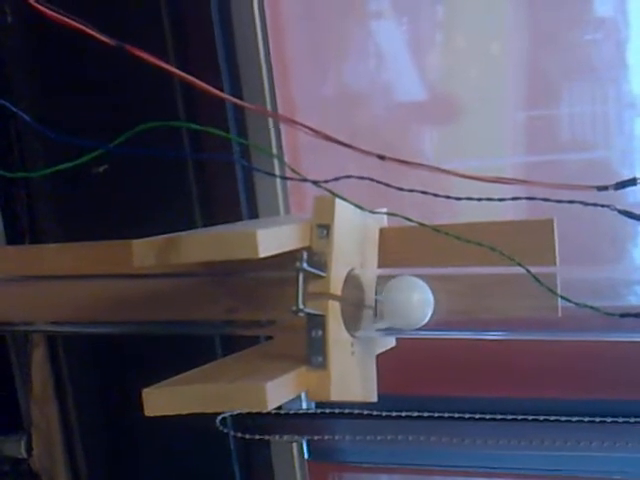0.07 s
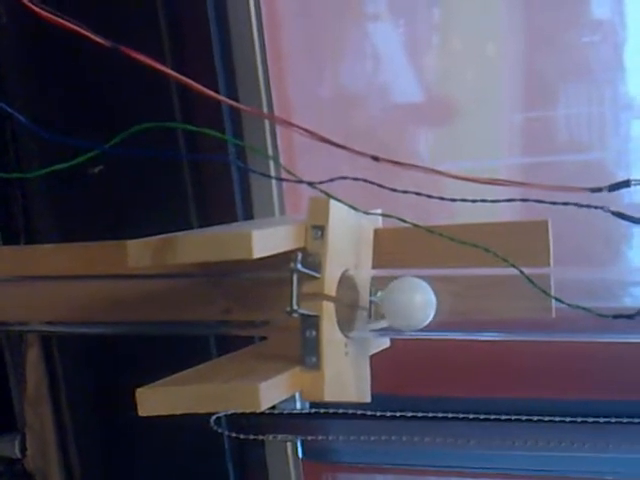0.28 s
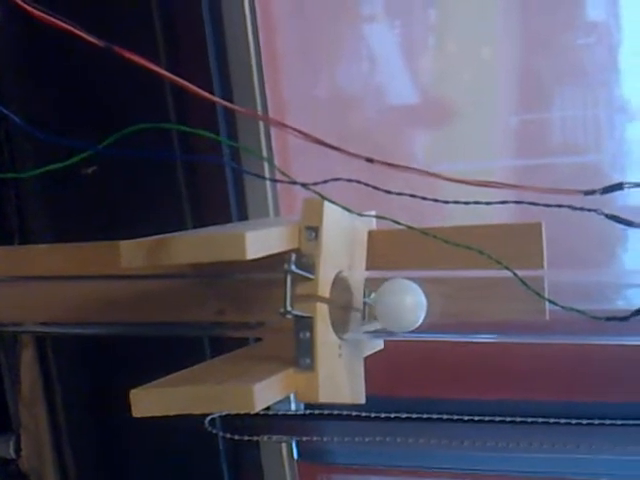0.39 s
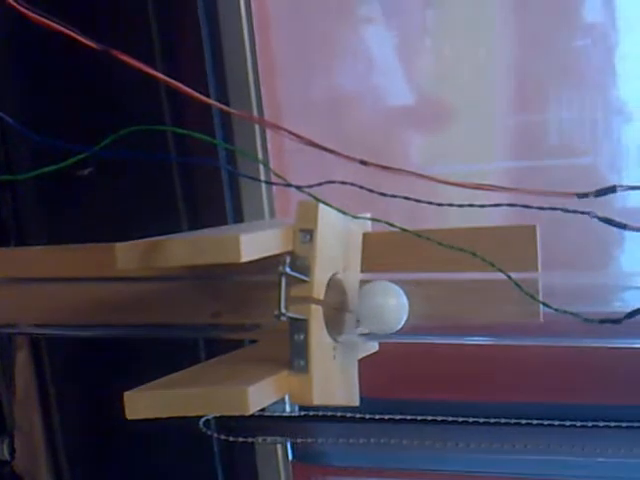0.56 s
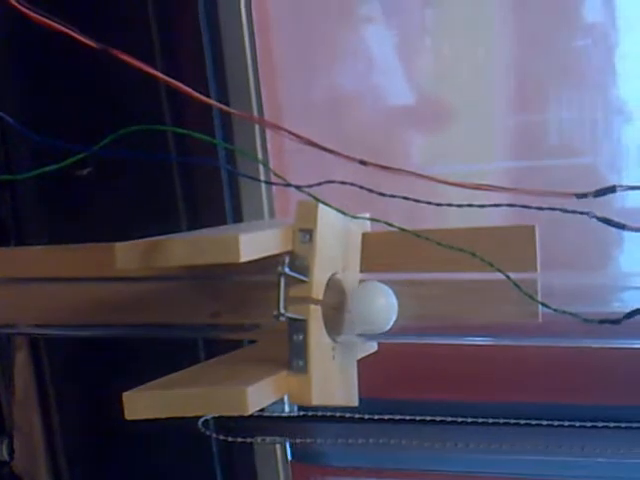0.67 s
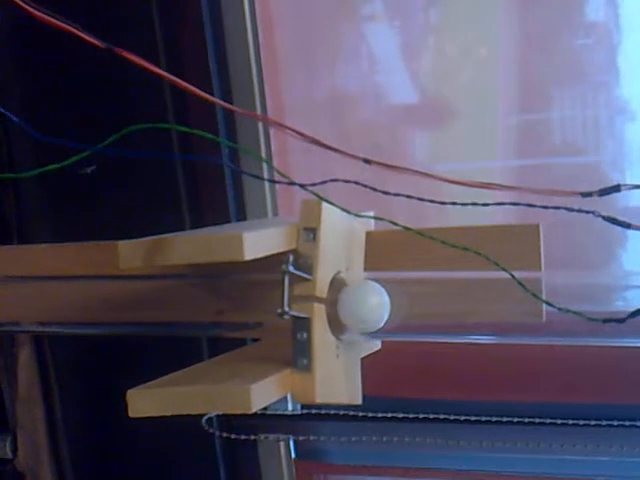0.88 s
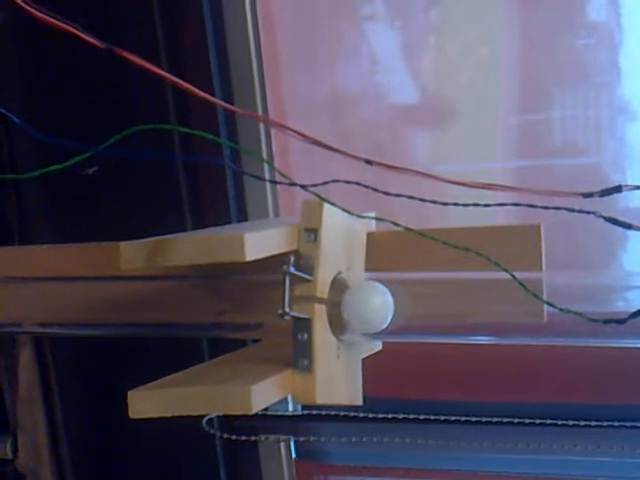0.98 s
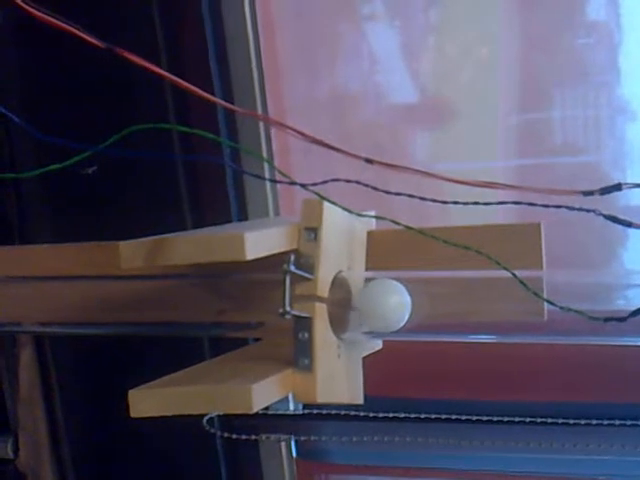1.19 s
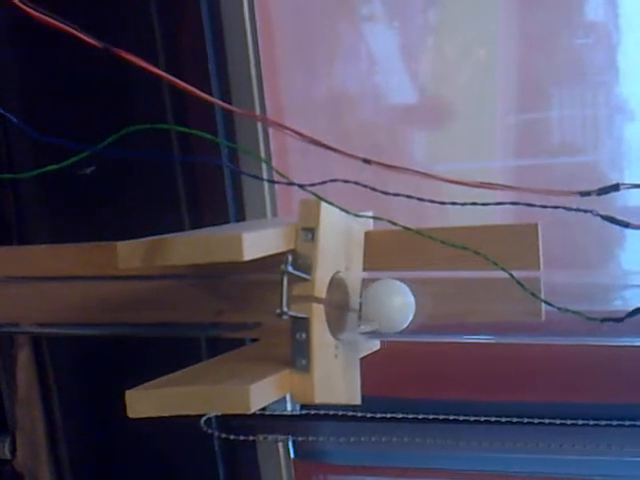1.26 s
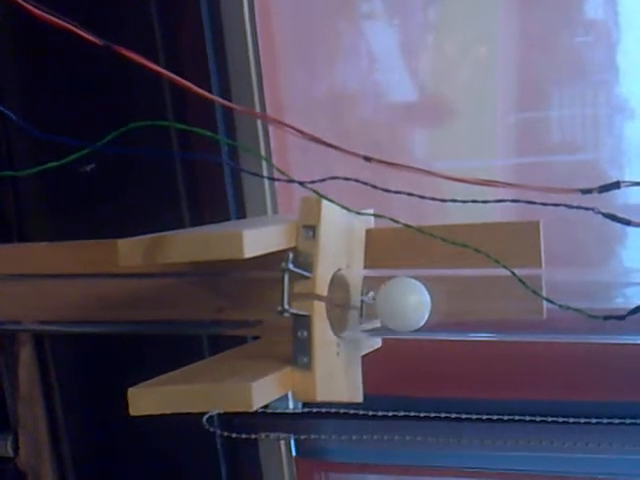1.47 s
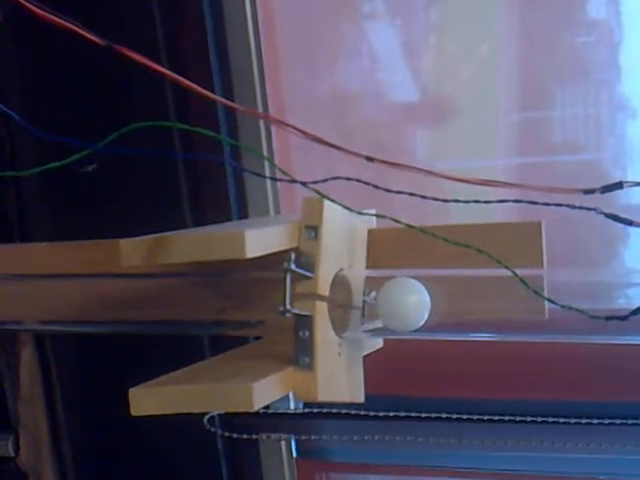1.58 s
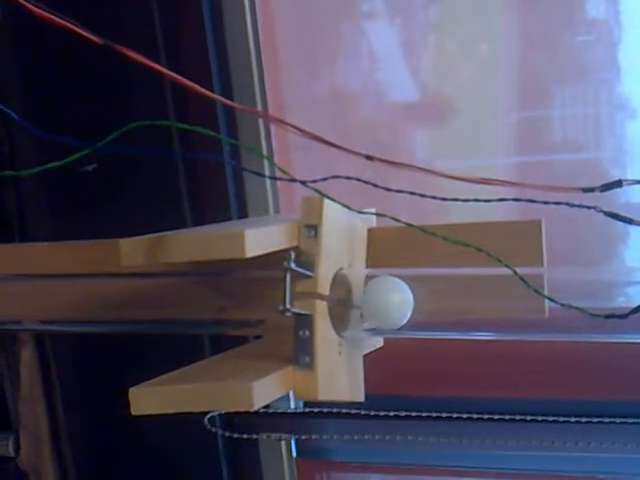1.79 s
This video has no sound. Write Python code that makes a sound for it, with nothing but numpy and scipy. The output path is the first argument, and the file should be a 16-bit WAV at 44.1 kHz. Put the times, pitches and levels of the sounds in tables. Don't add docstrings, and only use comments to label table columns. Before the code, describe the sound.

A light hollow ball knocks on a wooden stop in a live room, a few metres from the microphone. An earlier knock's tail fades under soft taps at 0.04-0.08 s; a loud, tight rattle follows at 0.2-0.25, then weaker knocks at 0.36-0.39. Faint taps come around 0.86-1.11, a moderate cluster at 1.2-1.26, and quiet ticks at 1.77. Reverberation trails over faint steady hiss and hum.

```python
import sys
import numpy as np
from scipy import signal
from scipy.fft import rfft, irfft
from scipy.io import wavfile
from scipy.ndimage import uniform_filter1d

SR = 44100
rng = np.random.default_rng(int(sys.argv[2]) if len(sys.argv) > 2 else 0)


def volts_from_db(level):
    exponent = np.asarray(level, float) / 20
    return 10 ** exponent


def bounce(signal):
    frames = np.transpose(np.atleast_2d(signal))
    limited = np.clip(frames, -1, 1)
    pcm = np.round(limited * 32767).astype(np.int16)
    wavfile.write(sys.argv[1], SR, pcm)


N = 79380


def unit_rms(x):
    return x / np.sqrt(np.mean(x ** 2) + 1e-20)


def interpolate_log(points, hz):
    f, value = np.transpose(points)
    return np.interp(np.log(hz + 1), np.log(f + 1), value)


# (frequency [Hz], density [dB per Hz])
HISS_SPECTRUM = [(15, -36), (25, 0.5), (144, -12.5), (291, -8), (333, -8), (708, -12), (768, -13.5),
                 (903, -6), (15700, -38)]
# (centre [Hz], width [Hz], level [dB])
HUM_BANDS = [(45, 20, -63), (137, 33, -65), (332.8, 4, -65), (1753, 1050, -59.5)]
HISS_DB, PATCH_DB = -57, 0.5


def hiss_and_hum():
    frames = N // 256 + 5
    hz = np.fft.rfftfreq(1024, 1 / SR)
    real, imaginary, patches = rng.standard_normal((frames, 513, 3)).T
    patches = uniform_filter1d(patches, size=12, axis=0)
    patches = unit_rms(uniform_filter1d(patches, size=12, axis=1))
    level_db = interpolate_log(HISS_SPECTRUM, hz)[:, None] + PATCH_DB * patches
    spectrum = (real + 1j * imaginary) * volts_from_db(level_db)
    hiss = signal.istft(spectrum, nperseg=1024, noverlap=768)[1][:N]
    out = volts_from_db(HISS_DB) * unit_rms(hiss)
    fine_hz = np.fft.rfftfreq(N, 1 / SR)
    for centre_hz, width_hz, db in HUM_BANDS:
        resonance = 1 / (1 + ((fine_hz - centre_hz) / width_hz * 2) ** 2)
        hum = irfft(rfft(rng.standard_normal(N)) * resonance, N)
        out = out + volts_from_db(db) * unit_rms(hum)
    return out


# (frequency [Hz], t60 [s])
ROOM_T60 = [(80, 0.51), (300, 0.33), (700, 0.4), (2000, 0.39), (5000, .33), (10000, 0.29), (16000, 0.29)]
HOLD_S, HOLD_SHARE = 0.079, 0.73
DIRECT_DB, BUILD_S = -32, 0.0043
LATE_DB, LATE_STRETCH = -23, 2.38


def room():
    hz, t, noise = signal.stft(rng.standard_normal(SR + SR // 2), SR, nperseg=256)
    fall_time = t - (1 - HOLD_SHARE) * np.minimum(t, HOLD_S)
    fall_db = -60 * fall_time / interpolate_log(ROOM_T60, hz)[:, None]
    early_power = volts_from_db(2 * fall_db)
    late_power = volts_from_db(2 * (LATE_DB + fall_db / LATE_STRETCH))
    tail = signal.istft(noise * np.sqrt(early_power + late_power), SR, nperseg=256)[1]
    tail = tail * (1 - np.exp(-np.arange(len(tail)) / SR / BUILD_S))
    tail = tail / np.linalg.norm(tail)
    return np.concatenate([[volts_from_db(DIRECT_DB)], tail])


def modal_sum(modes, t):
    return sum(volts_from_db(db - 60 * t / t60) * np.sin(2 * np.pi * hz * t) for hz, db, t60 in modes)


def ringing(modes, rise_s, t):
    return (1 - np.exp(-t / rise_s)) * modal_sum(modes, t)


# (time [s], tap [dB], frame ring [dB], tube ring [dB], hollow ball [dB])
FIRM_CONTACTS = [(.083, -43, -52, -48, -29), (0.2049, -14, -34, -44, -11), (.219, -12, -38, -29, -13),
                 (0.228, -7, -34, -32, -18), (0.237, -4.5, -27, -14, -8), (0.2403, -4.5, -28.5, -23, -12.5),
                 (.245, -16, -30, -27, -8), (0.2536, -2, -34.5, -43, -16), (.364, -18, -32.5, -57, -13.5),
                 (.377, -22, -38, -28.5, -7.5), (.392, -28, -37, -43, -28), (.425, -26, -41, -48, -34),
                 (0.526, -40, -60, -61, -44), (0.8817, -32.5, -57, -46, -31), (.9, -48, -70, -43.5, -41),
                 (1.11, -44, -68, -66, -50), (1.196, -38, -74, -62, -44), (1.2218, -17, -44, -49, -20),
                 (1.236, -21, -54, -54, -32), (1.258, -39, -47, -48, -24), (1.286, -28, -60, -54, -38),
                 (1.771, -30.5, -56, -53, -32), (1.776, -40, -58, -53, -52)]
# (frequency [Hz], level [dB], t60 [s])
TAP_MODES = [(1067, -6, 0.019), (2000, 3, 0.013), (1410, -3, 0.014), (3350, -24, 0.023),
             (4730, -9.5, 0.0065)]
# (frequency [Hz], level [dB], t60 [s])
FRAME_MODES = [(342.9, -2.5, 0.32), (400.5, -1.5, 0.2), (217, -7, 0.22), (126.7, -11.5, 0.26),
               (647, -5.5, .2), (901, 3, 0.18), (1017, -10, 0.18)]
# (frequency [Hz], level [dB], t60 [s])
TUBE_MODES = [(1918, 0, 0.26), (1975, -5.5, 0.28), (1793, -9, 0.59), (1662, -6, 0.28), (1554, -4, 0.14),
              (2150, -11, 0.18)]
# (frequency [Hz], level [dB], t60 [s])
HOLLOW_MODES = [(1955, -3, 0.021), (1628, -5.5, 0.011), (415, -16, 0.045)]
TAP_RISE_S, RING_RISE_S = 0.00045, 0.0013


def firm_taps():
    t = np.arange(SR // 2) / SR
    tap = ringing(TAP_MODES, TAP_RISE_S, t)
    frame = ringing(FRAME_MODES, RING_RISE_S, t)
    tube = ringing(TUBE_MODES, RING_RISE_S, t)
    hollow = ringing(HOLLOW_MODES, TAP_RISE_S, t)
    near, far = np.zeros((2, N + len(t)))
    for s, tap_db, frame_db, tube_db, hollow_db in FIRM_CONTACTS:
        start = round(s * SR)
        span = slice(start, start + len(t))
        near[span] += volts_from_db(tap_db) * tap + volts_from_db(frame_db) * frame + volts_from_db(tube_db) * tube
        far[span] += volts_from_db(hollow_db) * hollow
    return near[:N] + signal.fftconvolve(far, room())[:N]


def band(x, hz, kind):
    return signal.sosfilt(signal.butter(2, hz, kind, fs=SR, output="sos"), x)


# (frequency [Hz], level [dB])
BLOW_SPECTRUM = [(35, -49), (60, -20), (293, -14), (345, -0.5), (549, -19.5), (646, -6.5), (1930, -7),
                 (5260, -20.5), (15700, -49.5)]
# (frequency [Hz], level [dB], t60 [s])
WOOD_MODES = [(129, -11.5, 0.11), (212, -25, 0.36), (339, -1, 0.05), (377, -6.5, .1), (652, -3, 0.034),
              (875, -10, 0.23), (1017, -7.5, 0.14), (1430, -14.5, 0.03), (1514, -3.5, 0.1),
              (1757, 3.5, 0.017), (1940, 5, 0.017), (2139, -1.5, 0.013), (2278, -6.5, 0.01),
              (5020, -42, 0.013)]
WOOD_DB, THUD_HZ, TREBLE_HZ = -5, 560, 2740


def knock():
    size = 8192
    log_gain = np.log(volts_from_db(interpolate_log(BLOW_SPECTRUM, abs(np.fft.fftfreq(size, 1 / SR)))))
    phase = -signal.hilbert(log_gain).imag
    click = np.fft.ifft(np.exp(log_gain + 1j * phase)).real
    t = np.arange(size) / SR
    ring = modal_sum([(hz, db - 10 * np.log10(t60), t60) for hz, db, t60 in WOOD_MODES], t)
    whole = click / np.linalg.norm(click) + volts_from_db(WOOD_DB) * ring / np.linalg.norm(ring)
    thud = band(whole, THUD_HZ, "low")
    treble = band(whole, TREBLE_HZ, "high")
    return thud, whole - thud - treble, treble


# (time [s], blow [dB], treble [dB], thud [dB])
BOUNCES_HEARD = [(0.039, -22.5, 2.5, 5.5), (0.057, -19.5, 1, 2.5), (0.068, -22, -4.5, 7),
                 (0.082, -18.5, -0.5, -17), (0.198, -12, -1, -11), (0.204, -7.5, -7, -9),
                 (0.218, -2.5, 0, -4), (0.229, -5, 7.5, -5), (0.237, -3, -3.5, -3.5),
                 (0.244, -8.5, -15, -3.5), (0.253, -12, 0, -5), (0.363, -9, 3.5, 4.5), (0.376, -19, 5.5, 2),
                 (0.391, -23, 2, -19), (0.524, -59, 0, -26), (0.664, -63.5, 24, 16), (0.856, -30.5, 1, -16),
                 (0.863, -30, 1, 7.5), (0.881, -24, 5, -1), (1.004, -33.5, 2, 7), (1.074, -37, 0, -7),
                 (1.11, -34, 1.5, 6.5), (1.197, -27.5, 1.5, 7), (1.21, -13.5, 4.5, -4.5),
                 (1.221, -12, 4, -15), (1.235, -21.5, -4, 0), (1.258, -34, 0, 8), (1.761, -30.5, 4.5, 6),
                 (1.769, -26, -3, -14), (1.776, -25.5, -2, -12)]
EARLIER_S, EARLIER_DB = 0.12, -15
BLOW_DB = -6.5


def bouncing_ball():
    thud, body, treble = knock()
    lead, out = SR // 2, 0
    bounces = [(-EARLIER_S, EARLIER_DB, 0, 0)] + list(BOUNCES_HEARD)
    for path in range(3):
        blows = np.zeros(N + lead + len(thud))
        for s, db, treble_db, thud_db in bounces[path::3]:
            start = lead + round(s * SR)
            blow = volts_from_db(thud_db) * thud + body + volts_from_db(treble_db) * treble
            blows[start:start + len(thud)] += volts_from_db(db + BLOW_DB) * blow
        out = out + signal.fftconvolve(blows, room())[lead:lead + N]
    return out * 10


def scene():
    return (bouncing_ball() + firm_taps() + hiss_and_hum())[None]


def low_pass(x):
    return signal.sosfilt(signal.butter(12, 15890, fs=SR, output="sos"), x)


# (frequency [Hz], gain [dB])
MIC_RESPONSE = [(30, -6), (90, 1), (1200, -1.5), (2000, -2.5), (2400, 0), (2750, -2), (5000, 0.63),
                (11000, -0.74), (16000, -6)]
SELF_DB, EDGE_HZ = -73.5, 15830
FIZZ_DB, FIZZ_PER_DB, FIZZ_FALL_DB_S = -66, 0.6, 60


def record(dry):
    mic = irfft(rfft(dry) * volts_from_db(interpolate_log(MIC_RESPONSE, np.fft.rfftfreq(N, 1 / SR))), N)
    fall = np.arange(N) * FIZZ_FALL_DB_S / SR
    level_db = 10 * np.log10(abs(uniform_filter1d(mic[0] ** 2, size=800)) + 1e-9)
    held_db = np.maximum.accumulate(level_db + fall) - fall
    noise_gain = volts_from_db(SELF_DB) + volts_from_db(FIZZ_DB + FIZZ_PER_DB * (held_db + 23))
    thin_noise = np.diff(np.diff(rng.standard_normal(N + 2)))
    mic = mic + noise_gain * unit_rms(thin_noise)
    edge = signal.firwin(511, EDGE_HZ, window=("kaiser", 9), fs=SR)
    mix = signal.oaconvolve(mic, edge[None], "same")
    return low_pass(mix)


dry = scene()
out = record(dry)
bounce(out)
```